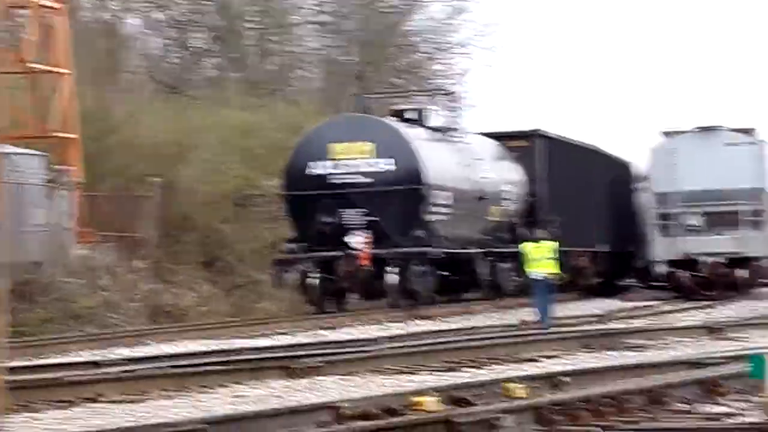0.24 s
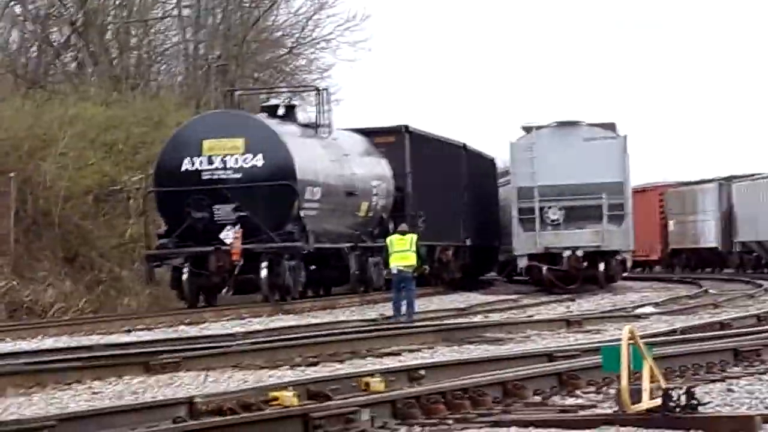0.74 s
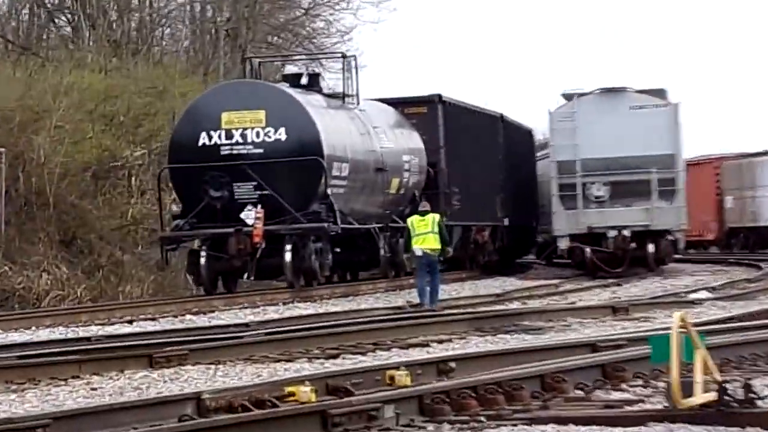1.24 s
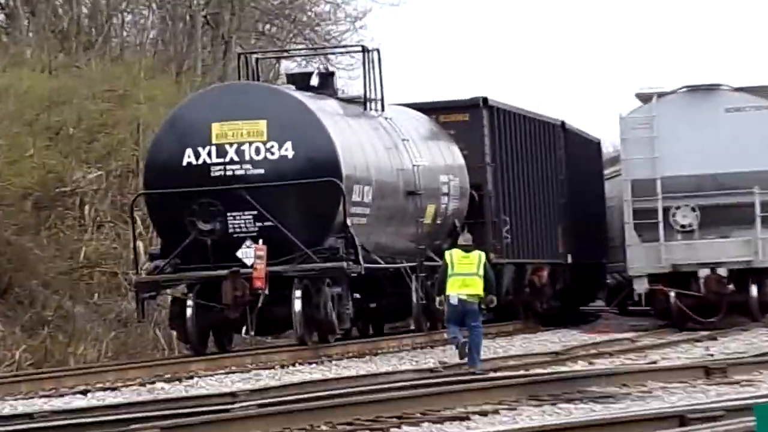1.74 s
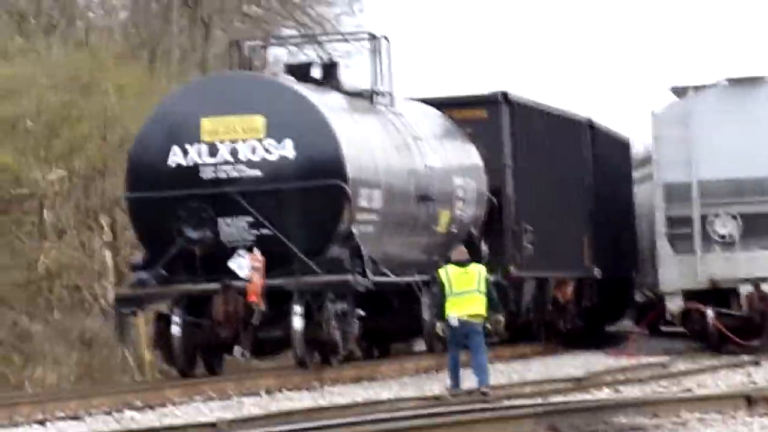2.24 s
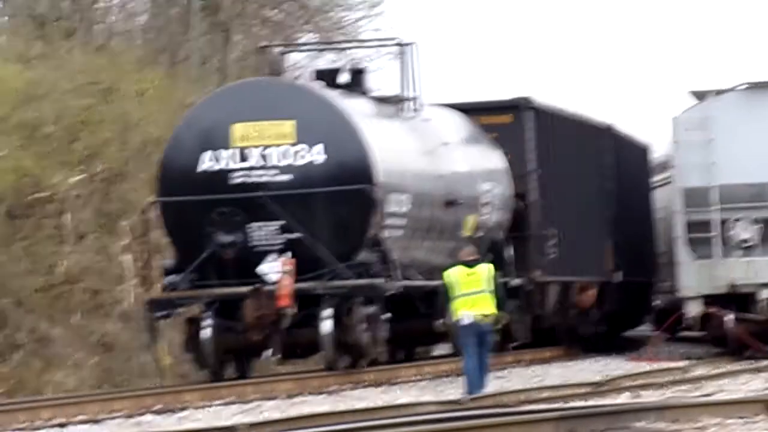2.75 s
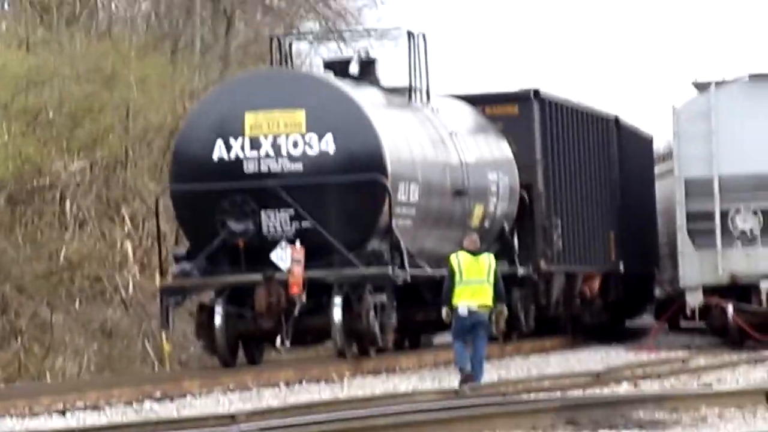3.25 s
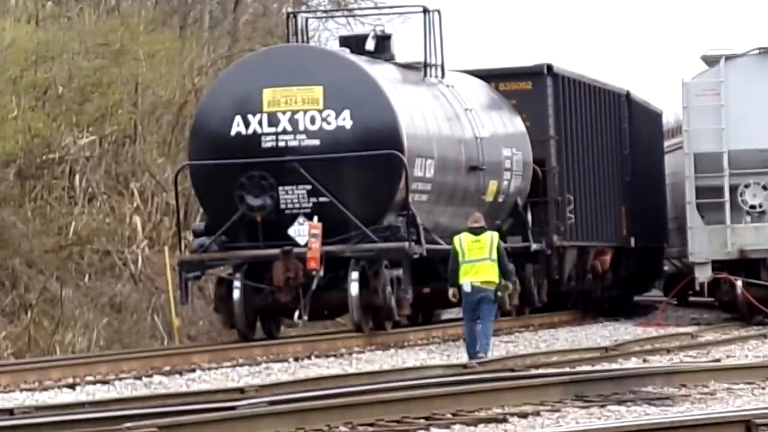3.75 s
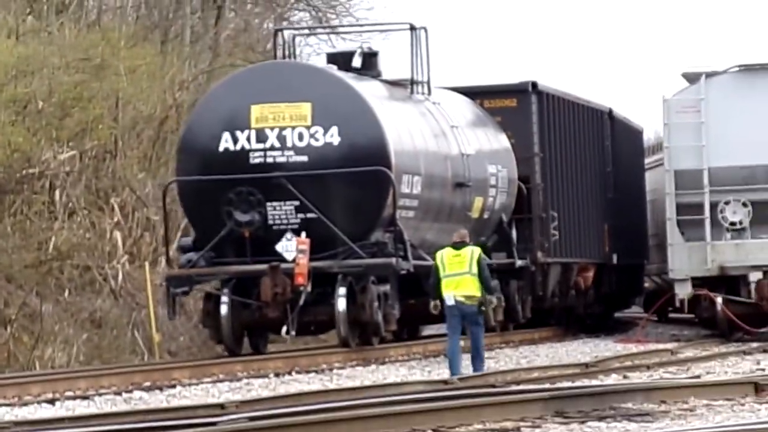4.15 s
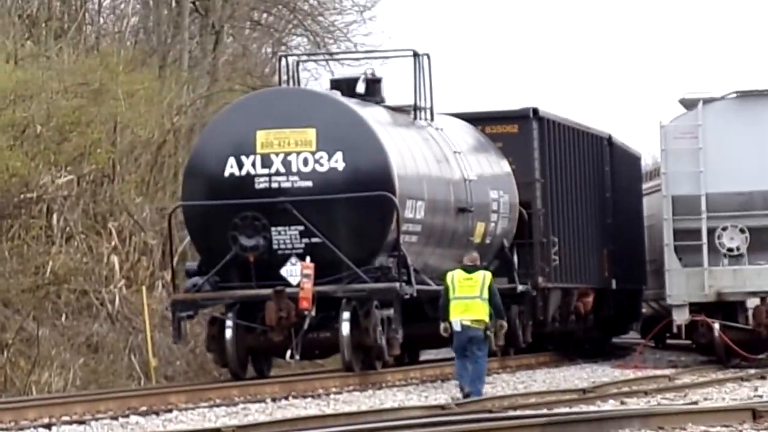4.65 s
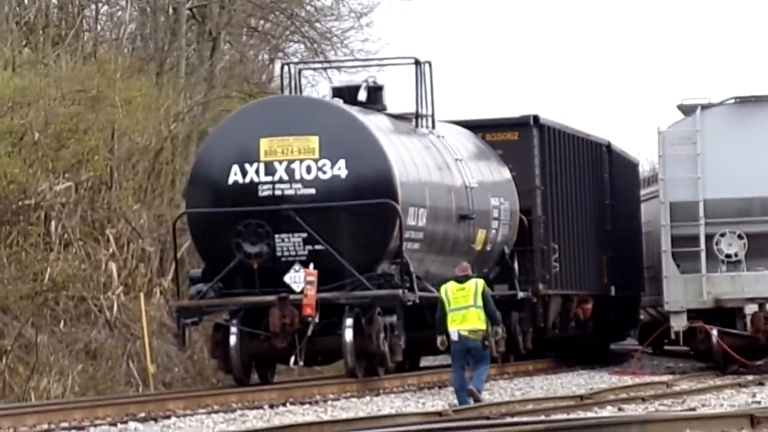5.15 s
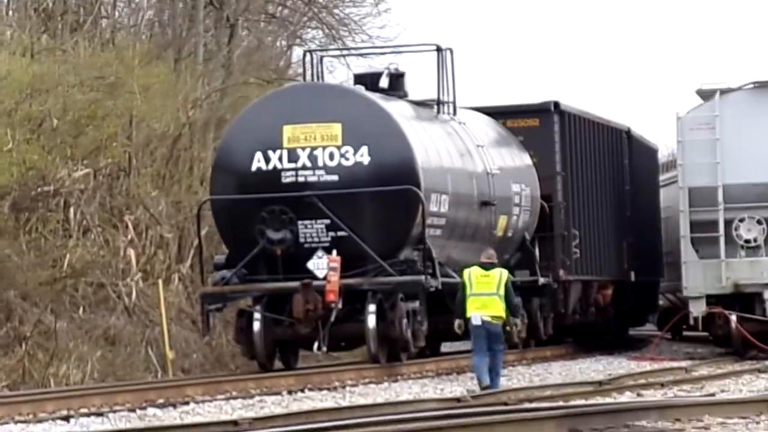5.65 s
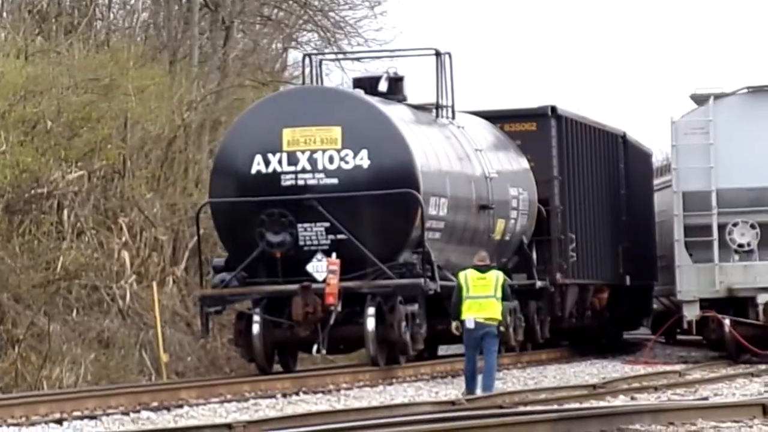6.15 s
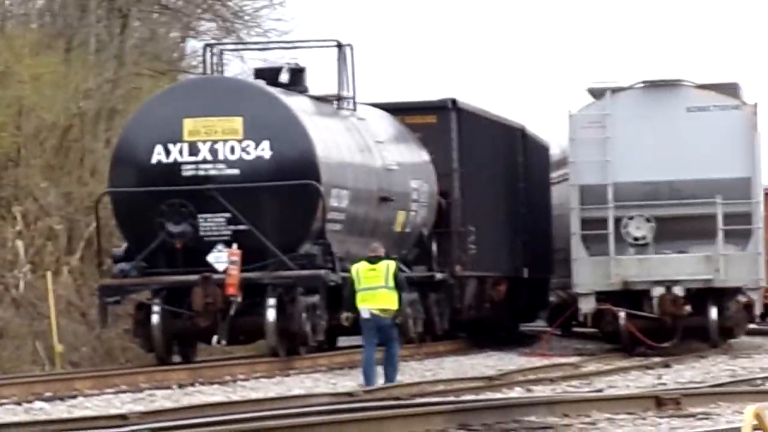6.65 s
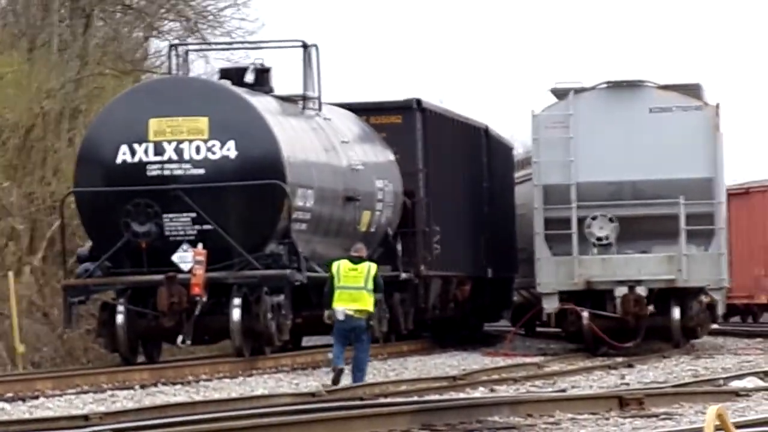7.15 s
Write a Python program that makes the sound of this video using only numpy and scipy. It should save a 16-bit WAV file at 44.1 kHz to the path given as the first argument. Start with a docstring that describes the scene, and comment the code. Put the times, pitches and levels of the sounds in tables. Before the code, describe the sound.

Freight cars creep through a yard curve, wheels shrieking in two high tones above rolling roar, light wind, and brief camera-handling clicks and muffling.

```python
"""A wheel squeals at once over rolling noise, a diesel drone and wind, as freight cars creep through a curve.
A second, higher squeal grows in. Stick-slip tones follow drifting pitches; shaped noise makes roar and wind.
A finger taps the hand-held camera with clicks and a knock, and its skin slides in noise grains.
It cups the microphone port for a second, seals it and lets go: three filters crossfade.
"""
import sys
import numpy as np
from scipy import signal
from scipy.fft import rfft, irfft
from scipy.io import wavfile
from scipy.ndimage import uniform_filter1d

SR = 44100
rng = np.random.default_rng(int(sys.argv[2]) if len(sys.argv) > 2 else 0)


def dump_mix(stems):
    """Bounce the given channels to the path in sys.argv[1] as a 16-bit WAV at rate SR."""
    frames = np.atleast_2d(stems).T  # one column per channel
    limited = np.clip(frames, -1, 1)  # hard clip at full scale
    pcm = np.round(limited * 32767).astype(np.int16)
    wavfile.write(sys.argv[1], SR, pcm)


N = 326781
T = np.arange(N) / SR  # seconds
HZ = np.fft.rfftfreq(N, 1 / SR)  # spectrum bins

# Leading wheel: the flange bites the rail and eases [start t/s, end t/s, lift/dB, easing/(dB/s)]
BITES = [(-.05, 1.002, 8, 0), (1.006, 1.642, 13, 4.5), (2.304, 2.4, 8, 5), (2.896, 3.75, 8.5, 8),
         (4.855, 5.15, 8, 29)]
# Slips off the mode [t/s, half length/s, pitch sag/Hz (negative rises), looseness (sign ignored)]
SLIPS = [(1.47, 0.171, -12, 0.9), (3.11, 0.094, 0, 1.0), (4.264, .38, 112, 4), (5.683, .22, 25.5, -2),
         (6.377, .07, 42.5, 0.3), (6.73, .07, 30, 0.2)]
# Tones beside the squeal [offset f/Hz, level/dB against the squeal without its bites]
SIDE_TONES = [(-400, -29.5), (-198, -17.5), (183, -21)]
# Rolling roar, relative spectrum [f/Hz, density/dB]
ROLL_SPECTRUM = [(100, -33.5), (420, -6), (720, 0), (900, 4), (1300, -6.5), (1500, -6), (2300, -1.5),
                 (3300, -4.5), (4400, -9), (5400, -10.5), (6100, -19), (7200, -17.5), (8600, -29.5),
                 (13500, -43.5)]
# Steel resonances that the roar keeps ringing [f/Hz, width/Hz, level/dB before the swells]
STEEL_RINGS = [(685, 134, -44.5), (1191, 240, -49.5), (2942, 150, -52.5), (4037, 71, -62.5),
               (5555, 70, -62.5), (7017, 108, -54.5)]
# Swells of the roar on rough rail [t/s, lift/dB, half length/s]
ROUGH_RAIL = [(2.93, 5.7, 0.19), (3.6, 4.4, 0.14), (4.37, 4.7, 0.073)]
# Diesel drone, relative spectrum [f/Hz, density/dB]
DRONE_SPECTRUM = [(25, -42), (45, -20), (65, -10), (100, -13), (140, -5.5), (175, -7), (207, 4.5),
                  (228, -8), (250, -1), (285, -4), (310, -12), (450, -23), (900, -50)]
# Steady tones of the yard's machinery [f/Hz, level/dB before the flutter]
HUM_TONES = [(672, -53), (1196, -57), (1309, -59), (2256, -57.5), (2339, -61), (3590, -61.5), (4595, -60.5)]
# Thin whines that strain upward [start t/s, end t/s, level/dB, letting go t/s, rise f/Hz, build-up/s]
THIN_WHINES = [(-.2, .6, -50, .75, 203, .46), (2.4, 3.05, -49, 3.04, 44.3, 0.39),
               (3.8, 7.6, -50, 6.22, 171.2, .76)]
# Brief rough whines from the running gear [t/s, level/dB, half length/s, f/Hz]
ROUGH_WHINES = [(.15, -49, 0.16, 2875), (.58, -51, 0.14, 4495), (3.15, -46.5, 0.17, 2860),
                (4.18, -48.5, 0.25, 2790), (4.83, -48.5, 0.18, 2800), (5.6, -56, 0.26, 2960)]
# Breeze on the microphone, relative spectrum [f/Hz, density/dB]
BREEZE_SPECTRUM = [(20, -34), (50, -10.5), (90, 0.5), (150, 2.5), (260, -3), (420, -15), (700, -18.5),
                   (1500, -41.5), (4000, -90)]
# Gusts of the breeze [t/s, lift/dB, half length/s]
GUSTS = [(.5, 3, 0.24), (3.67, 7.9, 0.17), (7.41, 14, 0.12)]
# Single wind buffets [t/s, level/dB, half length/s]
BUFFETS = [(.197, -22.5, .0042), (.466, -17.5, 0.0077), (.58, -29, 0.042), (.611, -18, 0.0045),
           (.637, -15, 0.0035), (.658, -21, 0.0095), (1.028, -23, 0.02), (1.237, -29.5, 0.0098),
           (1.43, -31, 0.011), (2.03, -28.5, 0.011), (2.21, -36, .016), (2.45, -32, 0.0058),
           (2.74, -27, 0.013), (3.655, -25.5, .0097), (3.715, -29, 0.019), (3.886, -25, 0.0034),
           (5.92, -35, 0.011), (6.25, -34.5, 0.011), (7.18, -27.5, 0.011), (7.395, -25, 0.0075)]
# Their relative spectrum [f/Hz, density/dB]
BUFFET_SPECTRUM = [(30, -30), (80, -8.5), (150, 8), (260, -0.5), (450, -12.5), (700, -18.5), (1500, -45.5),
                   (4000, -89)]
# Handling clicks [t/s, level/dB before dispersion and colour, decay/s]
CLICKS = [(0.546, -30, 0.0026), (0.6, -25.5, 0.0036), (0.692, -22.5, 0.0033), (.736, -26, 0.0024),
          (.855, -25, 0.0027), (1.7403, -12, 0.0029), (1.7432, -15, 0.0015), (1.893, -21.5, 0.002)]
# Filter that colours the clicks [f/Hz, gain/dB]
CLICK_COLOUR = [(100, -24), (500, 3.5), (1300, 7), (2200, 1), (3100, -1), (4000, 8.5), (6000, -14),
                (7200, 1.5), (9000, -6), (15000, -29)]
# Dull knocks of the finger on the case [t/s, starting level/dB, ring f/Hz, decay/s]
KNOCKS = [(1.894, -17.5, 470, 0.0026)]
# Skin sliding on the case [start t/s, end t/s, level/dB, soft treble limit f/Hz]
SLIDES = [(0.993, 1.92, -47.5, 11000), (1.833, 1.932, -46, 4400), (2.088, 2.124, -39, 3380),
          (2.146, 2.208, -37, 12200), (5.529, 5.558, -46, 5030)]
# Its relative spectrum, ahead of that limit [f/Hz, density/dB]
SLIDE_SPECTRUM = [(300, -17), (1500, -6.5), (3000, 13.5), (5000, 6), (7200, 3.5), (9000, -2), (13000, -3),
                  (16000, -26)]
# Car sway presses the second wheel harder or lighter [t/s, lift/dB, half length/s]
SWAYS = [(1.62, 3, 0.063), (1.86, -22, 0.066), (2.49, 7.5, 0.097), (5.17, -5.5, 0.15), (5.68, 5, 0.1),
         (6.33, -14, 0.031), (6.63, 5.5, 0.1), (7.25, -4.5, 0.069)]
# Low moans from the wheels [t/s, level/dB, half length/s, f/Hz]
MOANS = [(1.52, -46.5, .24, 587), (2.35, -49, 0.4, 595), (3.5, -45.5, 0.17, 588), (4.82, -45, 0.13, 599),
         (5.8, -54.5, 0.75, 519.4), (6.8, -54.5, 0.33, 538)]
# Response of the port under a cupped finger [f/Hz, gain/dB]
CUPPED_PORT = [(650, -1), (950, -10.5), (1220, -6), (1480, -19), (2000, -9.5), (2480, 3), (2750, 1),
               (3200, 9.5), (3900, 2), (4500, 3), (5100, -1), (7000, -4), (10000, -9), (11300, 7),
               (13000, 5), (13550, -3), (14400, 6), (15000, 2)]
# Response of the sealed port [f/Hz, gain/dB]
SEALED_PORT = [(300, 1), (1550, -14), (2300, -22), (3000, -5.5), (4000, -16.5), (5100, 0), (6000, 1.5),
               (6800, -26), (10000, -22), (15000, -14)]
# The camera's notch filters [f/Hz, width/Hz]
NOTCHES = [(3700, 102), (7890, 90), (8090, 910), (11720, 520)]

LEAD_HZ, SECOND_HZ = 5079, 5954  # wheel modes
# From this moment both squeals creep upward
CREEP_FROM_S, LEAD_CREEP_HZ_PER_S, SECOND_CREEP_HZ_PER_S = 3.9, 23, 6.1
LEAD_DB, LEAD_FADE_FROM_S, LEAD_FADE_DB_PER_S = -38.5, 6.48, 8
BITE_ATTACK_S, BITE_RELEASE_S = 0.026, 0.043
DRAG_HZ_PER_DB = 1.4  # a hard bite drags the pitch down
LEAD_LOCK = 1.22  # steady over scattered sound, before any looseness
OCTAVE_DB, OCTAVE_FADE_DB_PER_S = -21, 0.5  # against the squeal
SIDE_SHARE = 0.45  # share of a bite's lift that reaches the side tones
ROLL_DB, ROLL_EASE_DB_PER_S = -43, 0.25
WHINE_REST_HZ, WHINE_DIP_HZ = 3033, 215
WHINE_LET_GO_S, WHINE_DIP_AFTER_S, WHINE_DIP_HALF_S = 0.06, 0.2, 0.11
# The breeze drops to a lull, centred on LULL_S
BREEZE_DB, LULL_S, LULL_OVER_S, LULL_DB = -40, 3.45, 1.7, 8.5
# Skin catches: mean rate, added strength, share of a cycle in which each dies away
CATCHES_PER_S, CATCH_STRENGTH, CATCH_SHARE = 58, 1.4, 0.14
# The second wheel grows up to this moment, then holds
ENTERED_S, ENTRY_DB_PER_S, SECOND_DB = 2.37, 14, -43.5
SECOND_LOCK, SECOND_LOCK_PER_S = 0.15, 0.19  # steady over scattered sound at the start, and its growth
PRESS_S, HOLLOW_HZ, HOLLOW_WIDTH_HZ = 1.243, 10130, 440  # the pressed finger's hollow cancels a band
EDGE_HZ = 15720  # upper band limit


def amp(db):
    """Decibels to gain."""
    return 10 ** (np.asarray(db) / 20)


def unit(x):
    """Scales to an rms of one."""
    return x / np.sqrt(np.mean(abs(x) ** 2) + 1e-20)


def colour(x, points):
    """Filters by gains in dB, joined up along log frequency."""
    hz, db = np.transpose(points)
    gain = amp(np.interp(np.log(HZ + 1), np.log(hz), db))
    return irfft(rfft(x) * gain, N)


def noise(points):
    """Noise of unit rms with the given relative spectrum."""
    return unit(colour(rng.standard_normal(N), points))


def notched(x, rows):
    """Cuts out narrow bands, down to silence at each centre."""
    gains = [(HZ - hz) ** 2 / ((HZ - hz) ** 2 + (width / 2) ** 2) for hz, width in rows]
    return irfft(rfft(x) * np.prod(gains, axis=0), N)


def flutter(width_hz):
    """Complex random motion of unit rms, rolling off above the given rate."""
    size = N // 16
    hz = np.fft.fftfreq(size, T[-1] / size)
    spectrum = rng.standard_normal(size) + 1j * rng.standard_normal(size)
    z = np.fft.ifft(spectrum / (1 + abs(hz / width_hz) ** 3))
    return unit(np.interp(T, np.linspace(0, T[-1], size), z))


def turn(hz):
    """A rotating phasor that follows a pitch."""
    return np.exp(2j * np.pi * np.cumsum(hz * np.ones(N)) / SR)


def step(s, length):
    """Rises from 0 to 1 around a moment."""
    return np.clip((T - s) / length + 0.5, 0, 1)


def since(s):
    """Seconds gone by after a moment."""
    return np.maximum(T - s, 0)


def bell(s, half):
    """A bell of height one around a moment."""
    return np.exp(-0.5 * ((T - s) / half) ** 2)


def lifts(rows):
    """Bell-shaped rises and falls of a level, in dB."""
    return sum(db * bell(s, half) for s, db, half in rows)


def swells(rows):
    """Bell-shaped bursts of strength."""
    return sum(amp(db) * bell(s, half) for s, db, half in rows)


def sung(rows):
    """Tones that swell and fade, each on its own pitch."""
    return sum(amp(db) * bell(s, half) * turn(hz) for s, db, half, hz in rows)


def scatter(direct, width_hz):
    """Paths off cars and ground add to the steady sound, so a tone beats quickly and fades slowly."""
    paths = direct + flutter(width_hz)
    evened = paths / np.sqrt(uniform_filter1d(abs(paths) ** 2, size=5000))
    fading = amp(2.93 * flutter(7.2).real)
    return unit(fading * evened)


def leading_wheel():
    """Stick-slip locks onto one wheel mode, with an octave; slower wheelset vibrations add side tones."""
    slipping = np.array([1 / (1 + ((T - s) / half) ** 6) for s, half, _, _ in SLIPS])
    sag_hz, looseness = np.array(SLIPS)[:, 2:].T @ slipping
    lock = LEAD_LOCK / (1 + abs(looseness))
    bite_db = 0
    for start, end, db, easing in BITES:
        gate = step(start, BITE_ATTACK_S) - step(end, BITE_RELEASE_S)
        bite_db = bite_db + (db - easing * since(start)) * gate
    level_db = LEAD_DB + bite_db - LEAD_FADE_DB_PER_S * since(LEAD_FADE_FROM_S)
    pitch_hz = LEAD_HZ + LEAD_CREEP_HZ_PER_S * since(CREEP_FROM_S) - DRAG_HZ_PER_DB * bite_db - sag_hz
    # the looser the lock, the more the pitch wanders
    wander_hz = 10 * flutter(9).real / (lock + 0.7)
    mode = turn(pitch_hz + wander_hz)
    tone = mode * scatter(lock, width_hz=40)
    octave_db = OCTAVE_DB - OCTAVE_FADE_DB_PER_S * T + 2.9 * flutter(7.8).real
    octave = amp(octave_db) * mode ** 2 * scatter(1.16 * lock, width_hz=91)
    beside = sum(amp(db) * turn(hz) * flutter(33) for hz, db in SIDE_TONES)
    # takes back part of the bite that level_db applies to everything
    sides = amp((SIDE_SHARE - 1) * bite_db) * mode * beside
    return np.sqrt(2) * amp(level_db) * (tone + octave + sides).real


def rolling():
    """Rough treads on rail make a wide roar and keep the steel ringing, harder as the roar swells."""
    level_db = ROLL_DB - ROLL_EASE_DB_PER_S * T + lifts(ROUGH_RAIL)
    roar = noise(ROLL_SPECTRUM) * amp(level_db + 1.13 * flutter(14).real)
    ring = 0
    for hz, width, db in STEEL_RINGS:
        shimmer = unit(flutter(width / 4) + flutter(width))
        ring = ring + amp(db) * (turn(hz) * shimmer).real
    swell = amp(0.62 * (level_db - level_db.mean()))
    return roar + np.sqrt(2) * ring * swell


def machinery():
    """A distant diesel's drone, steady tones, and thin and rough whines from the running gear."""
    drone = amp(-39.0) * noise(DRONE_SPECTRUM)
    hum = sum(amp(db) * (turn(hz) * (0.85 + 0.58 * flutter(7.0))).real for hz, db in HUM_TONES)
    thin = sum(whine(*row) for row in THIN_WHINES) * scatter(direct=6.2, width_hz=18)
    rough = sung(ROUGH_WHINES) * scatter(direct=0.7, width_hz=38)
    return drone + np.sqrt(2) * (hum + thin + rough).real


def whine(start, end, db, let_go, rise_hz, build_s):
    """Rubbing steel climbs in pitch ever faster, then lets go, swoops below its resting pitch and recovers."""
    climb = np.minimum(T - let_go, 0) / build_s
    release = since(let_go) / WHINE_LET_GO_S
    strain_hz = rise_hz * np.exp(climb - release)
    dip_hz = WHINE_DIP_HZ * bell(let_go + WHINE_DIP_AFTER_S, WHINE_DIP_HALF_S)
    gate = step(start, 0.26) - step(end, 0.22)
    return amp(db) * gate * turn(WHINE_REST_HZ + strain_hz - dip_hz)


def wind():
    """Eddies push on the microphone: a lumpy breeze and short buffets."""
    level_db = BREEZE_DB - LULL_DB * step(LULL_S, LULL_OVER_S) + lifts(GUSTS)
    breeze = noise(BREEZE_SPECTRUM) * amp(level_db + 4.6 * flutter(19.4).real)
    eddies = noise(BUFFET_SPECTRUM)
    # even out the strength, so the table alone sets each buffet's level
    eddies /= np.sqrt(uniform_filter1d(eddies ** 2, size=900))
    return breeze + eddies * swells(BUFFETS)


def struck(s, db, decay):
    """A blow starts at once and dies away exponentially."""
    return amp(db) * (T >= s) * np.exp(-abs(T - s) / decay)


def handling():
    """Short clicks and knocks in the camera's case, and skin sliding over it."""
    snaps = sum(struck(*row) for row in CLICKS) * rng.standard_normal(N)
    # bending waves carry the bass later than the treble, so each click chirps downward
    lag_s = 0.13 * np.maximum(1 / np.sqrt(HZ + 100) - 1 / np.sqrt(6000), 0)
    phase = 2 * np.pi * np.cumsum(lag_s) * HZ[1]
    clicks = colour(irfft(rfft(snaps) * np.exp(-1j * phase), N), CLICK_COLOUR)
    knocks = sum(struck(s, db, decay) * np.sin(2 * np.pi * hz * (T - s)) for s, db, hz, decay in KNOCKS)
    return clicks + knocks + sum(slide(*row) for row in SLIDES)


def slide(start, end, db, top_hz):
    """Skin sticks and slips in tiny grains, with an uneven ripple of catches."""
    cycle = np.cumsum(CATCHES_PER_S * (1 + 0.28 * flutter(25).real)) / SR % 1
    catches = 1 + CATCH_STRENGTH * np.exp(-cycle / CATCH_SHARE)
    grains = noise(SLIDE_SPECTRUM) * amp(1.3 * flutter(90).real) * catches
    grains = irfft(rfft(grains) / (1 + (HZ / top_hz) ** 6), N)
    return amp(db) * unit(grains) * (step(start, 0.0047) - step(end, 0.013))


def second_wheel():
    """A higher squeal, rough at first, grows as its wheel enters the curve and becomes purer; low moans."""
    mode = turn(SECOND_HZ + SECOND_CREEP_HZ_PER_S * since(CREEP_FROM_S))
    level_db = SECOND_DB - ENTRY_DB_PER_S * np.maximum(ENTERED_S - T, 0) + lifts(SWAYS)
    tone = mode * scatter(SECOND_LOCK + SECOND_LOCK_PER_S * T, width_hz=25)
    octave = amp(-30) * mode ** 2 * flutter(20)
    moan = sung(MOANS) * scatter(direct=1.8, width_hz=3.9)
    return np.sqrt(2) * (amp(level_db) * (tone + octave) + moan).real


def scene():
    """All that reaches the microphone, on one channel."""
    train = leading_wheel() + rolling() + machinery()
    return (train + wind() + handling() + second_wheel())[None]


def record(dry):
    """A finger cups the port, presses, seals it and lets go; then circuit hiss, notches and the band limit."""
    x = dry[0]
    cup, press = step(0.99, 0.027), step(PRESS_S, 0.072)
    seal, free = step(1.925, 0.013), step(2.048, 0.0078)
    cupped = colour(x, CUPPED_PORT)
    pressed = notched(cupped, [(HOLLOW_HZ, HOLLOW_WIDTH_HZ)])
    cupped = (1 - press) * cupped + press * pressed
    sealed = colour(x, SEALED_PORT)
    x = (1 - cup + free) * x + (cup - seal) * cupped + (seal - free) * sealed
    hiss = amp(-80.0) * rng.standard_normal(N)
    x = notched(x + hiss, NOTCHES)
    band_limit = signal.firwin(1023, EDGE_HZ, window=("kaiser", 9), fs=SR)
    return signal.oaconvolve(x, band_limit, "same")[None]


dry = scene()
out = record(dry)
dump_mix(out)
```